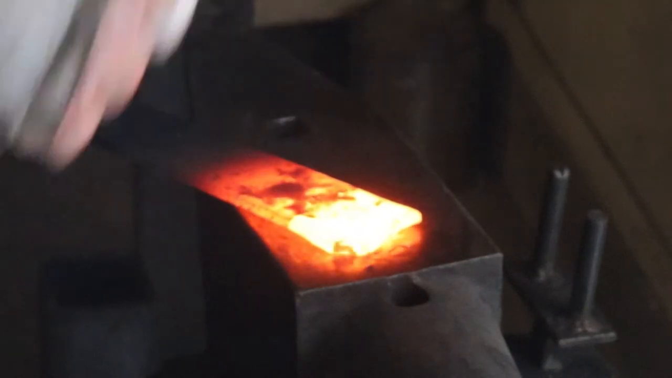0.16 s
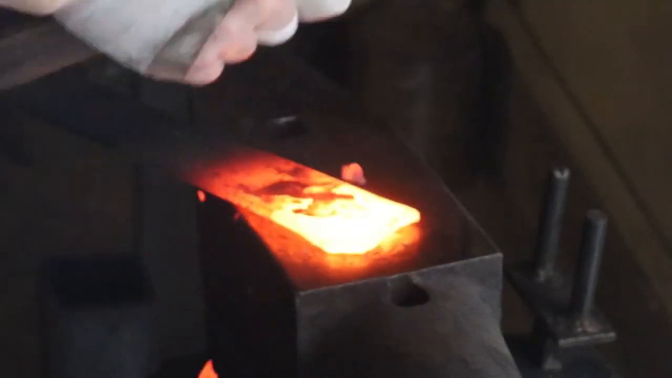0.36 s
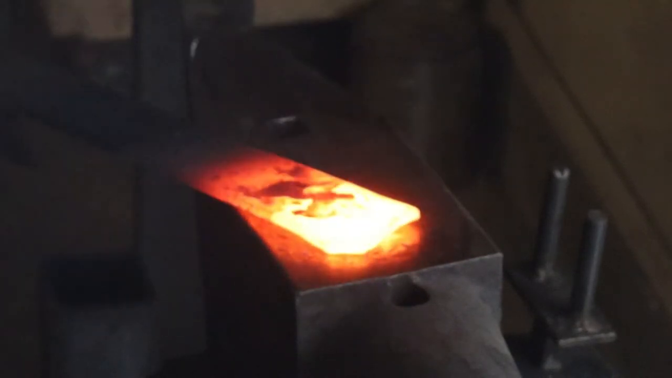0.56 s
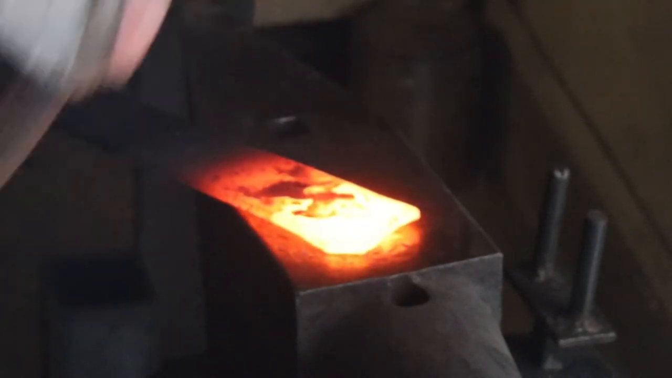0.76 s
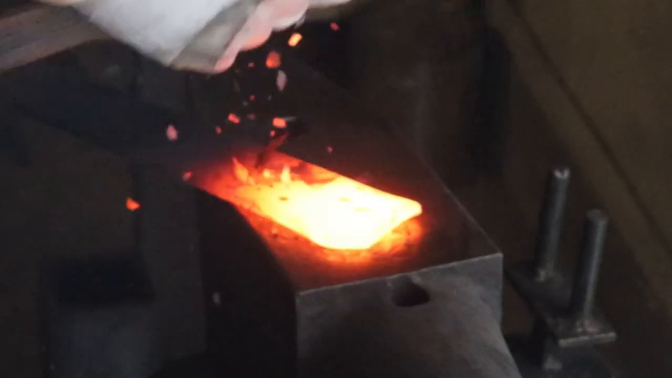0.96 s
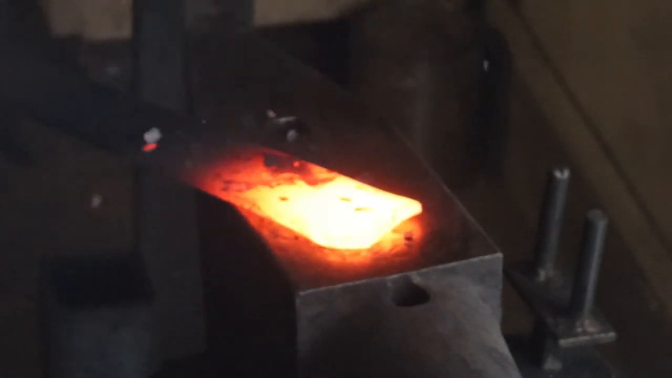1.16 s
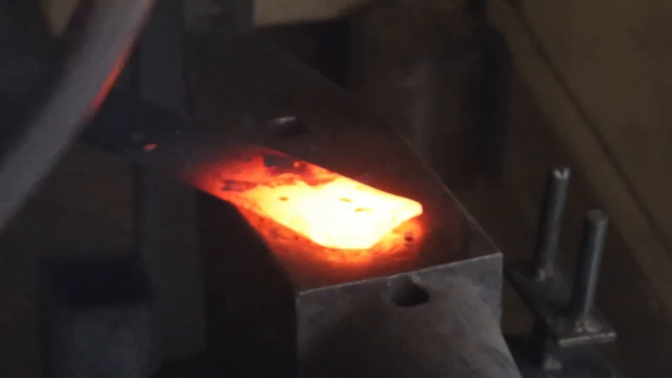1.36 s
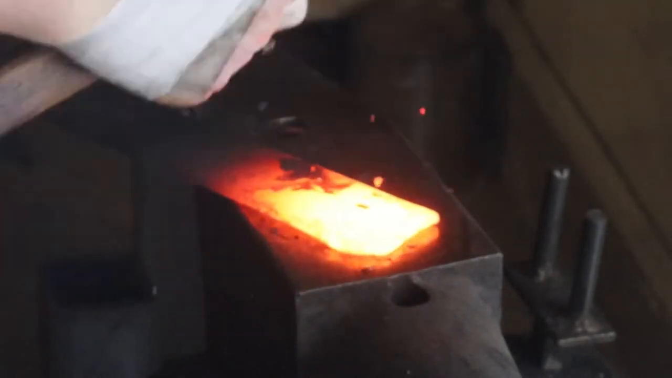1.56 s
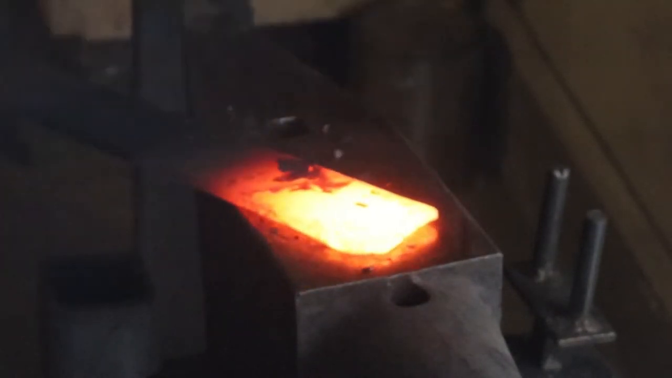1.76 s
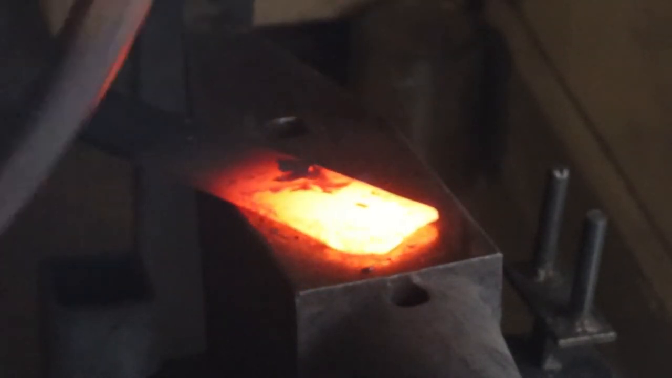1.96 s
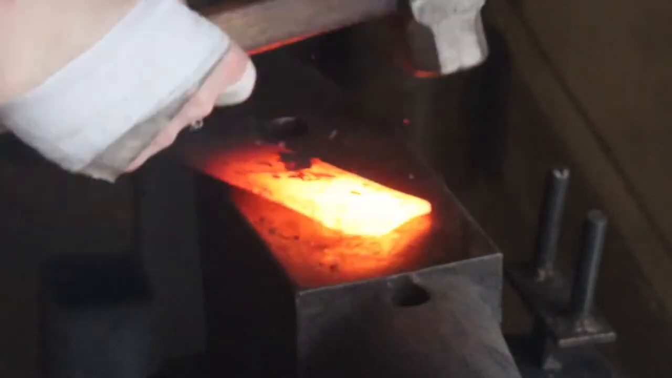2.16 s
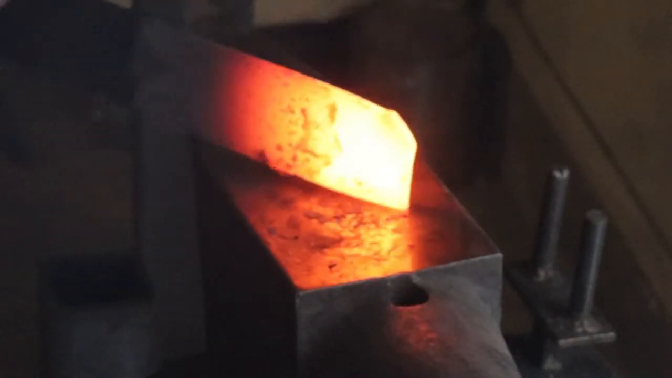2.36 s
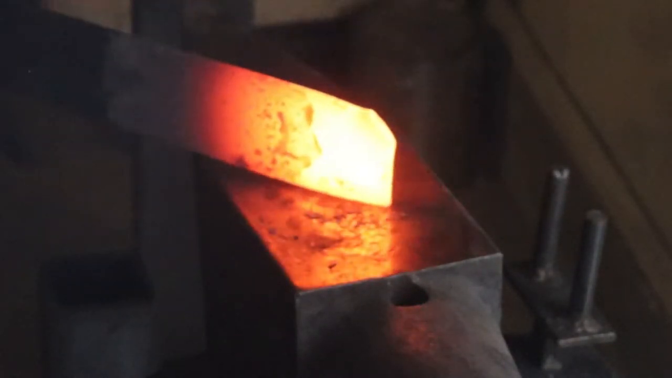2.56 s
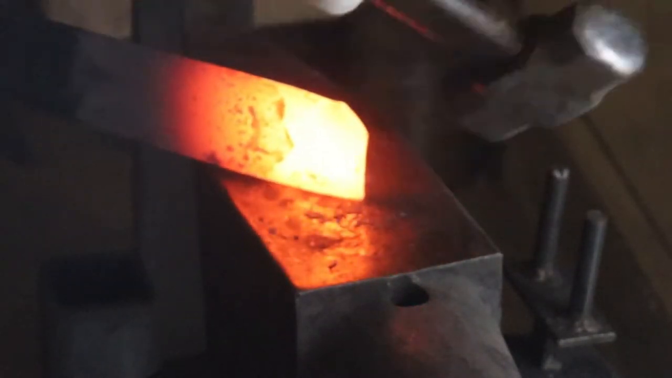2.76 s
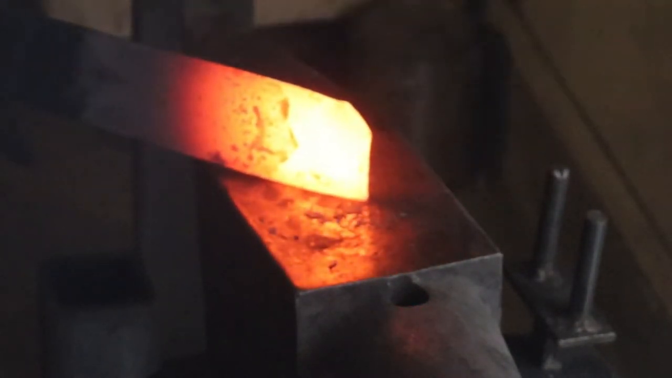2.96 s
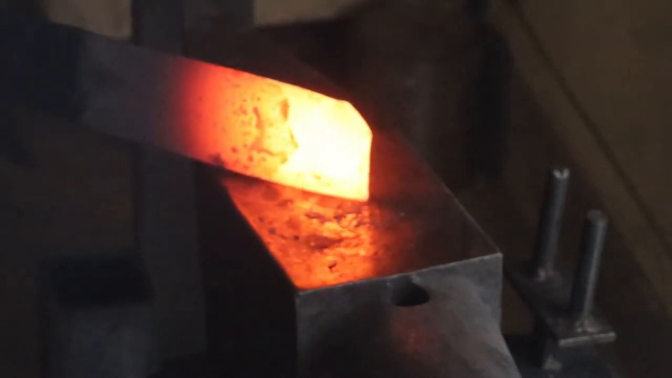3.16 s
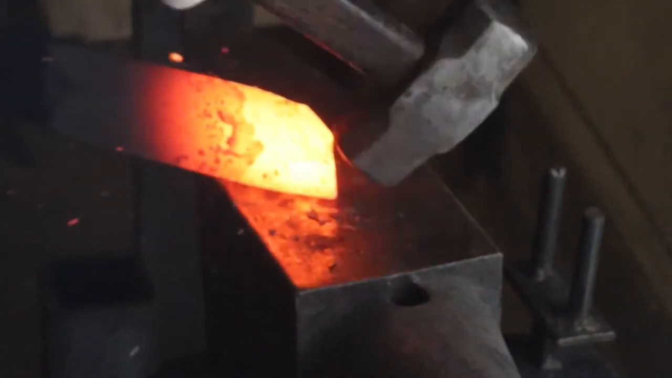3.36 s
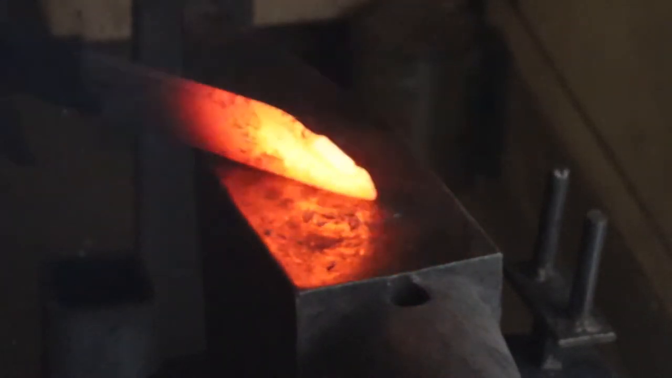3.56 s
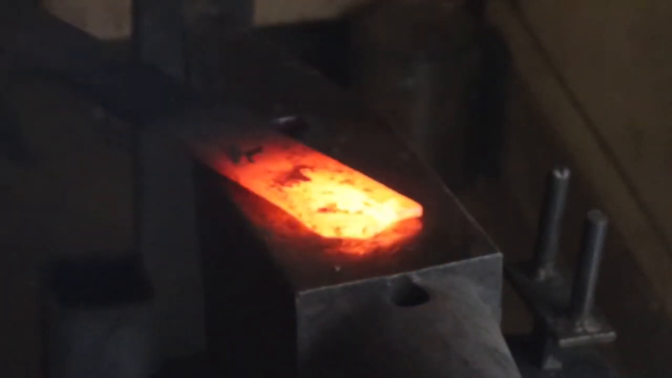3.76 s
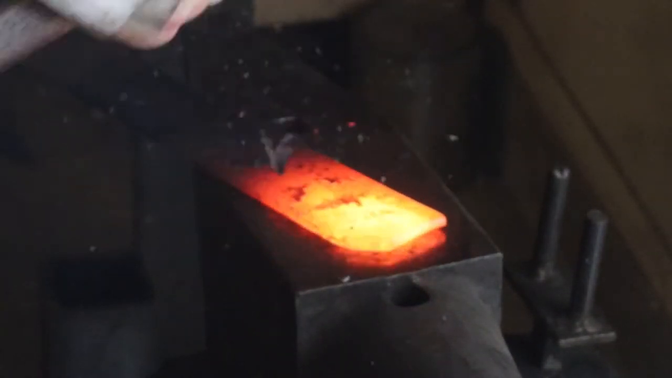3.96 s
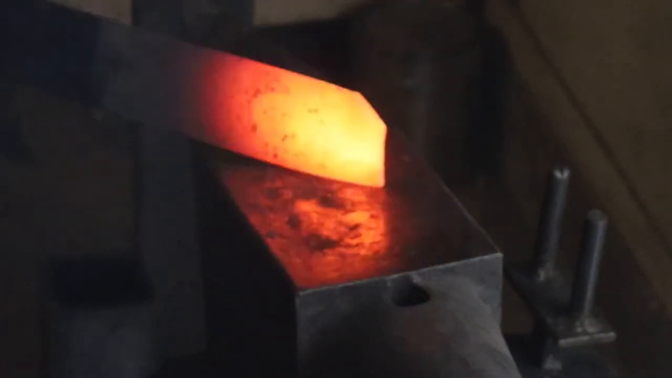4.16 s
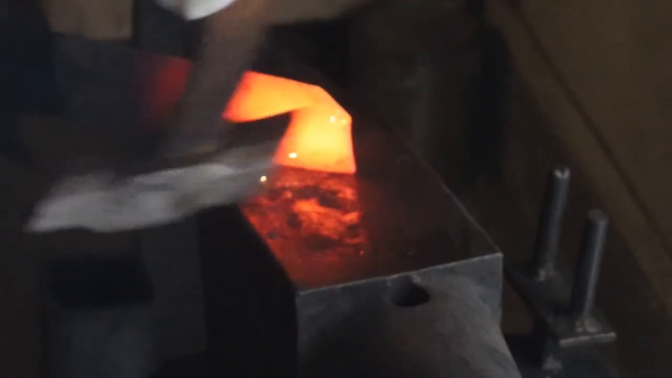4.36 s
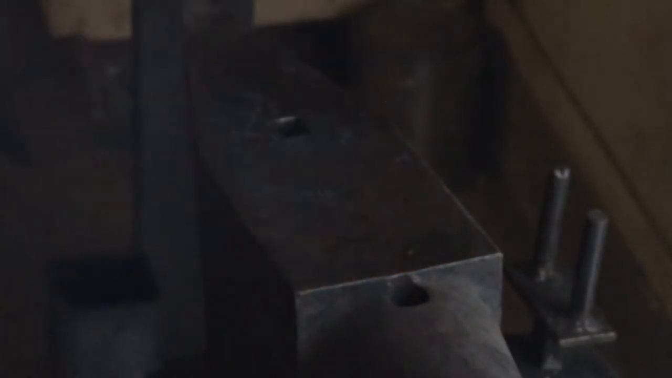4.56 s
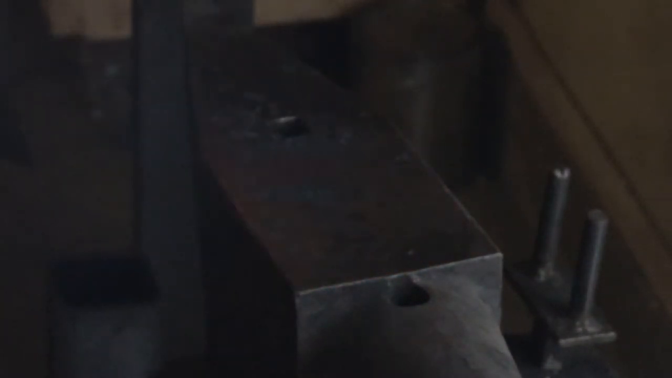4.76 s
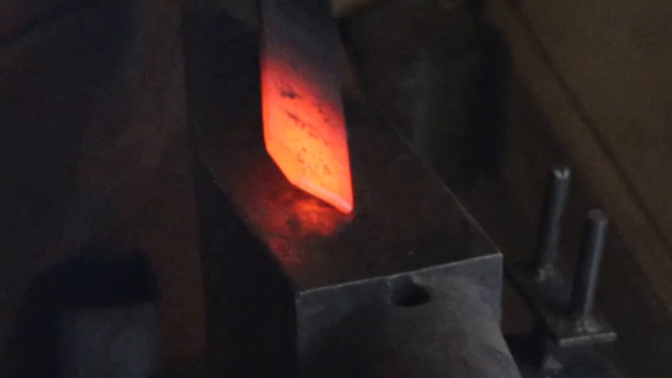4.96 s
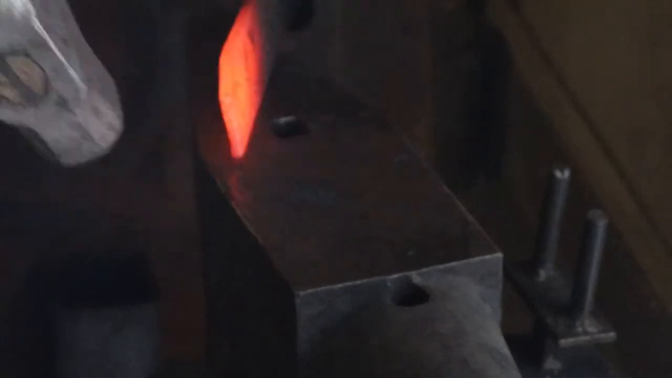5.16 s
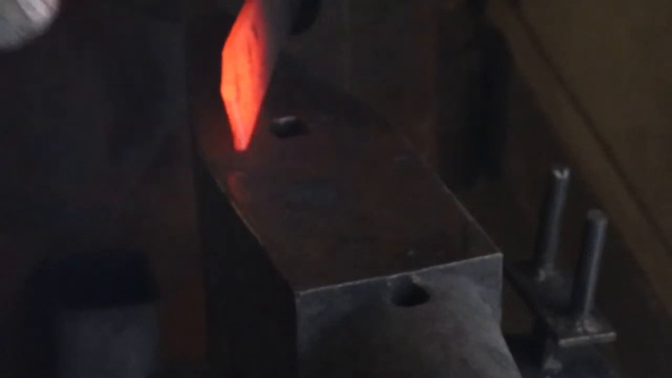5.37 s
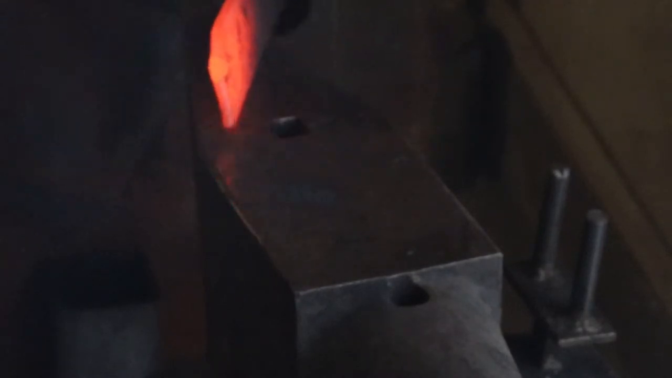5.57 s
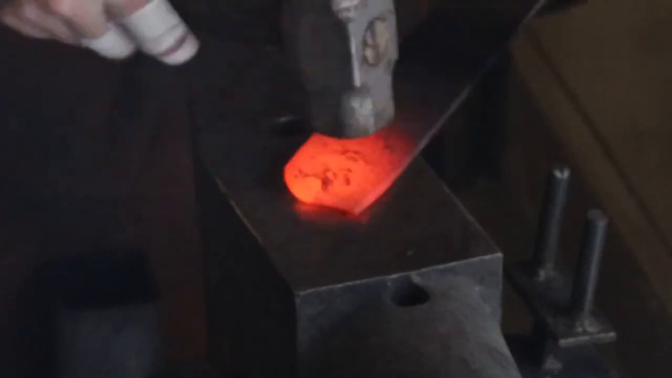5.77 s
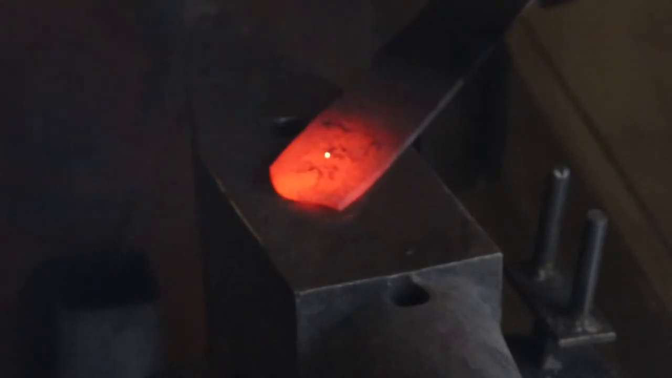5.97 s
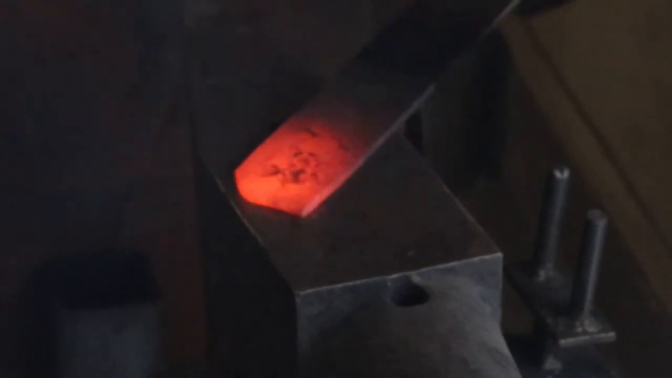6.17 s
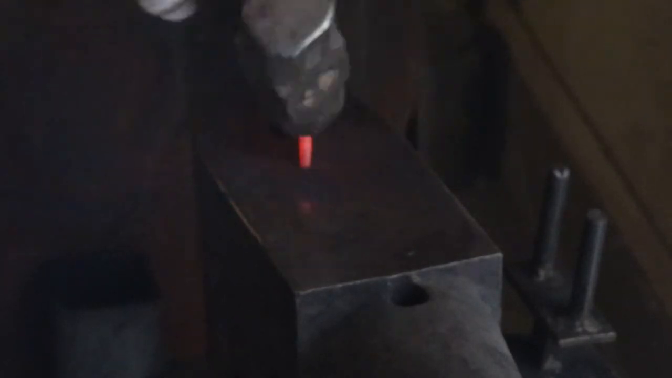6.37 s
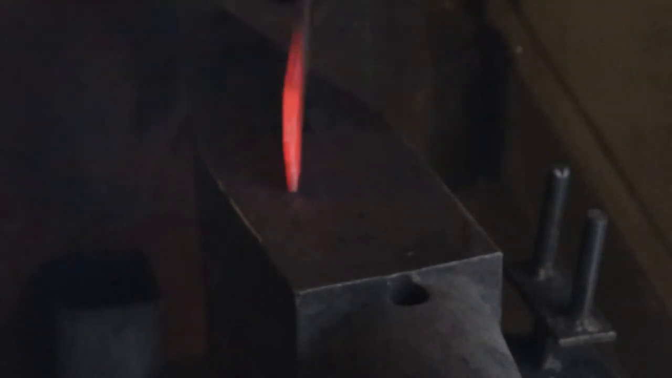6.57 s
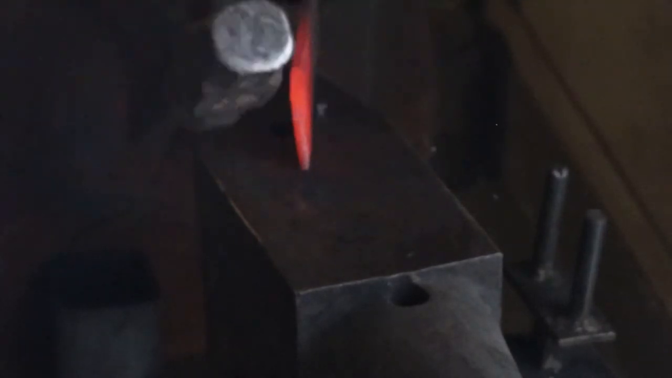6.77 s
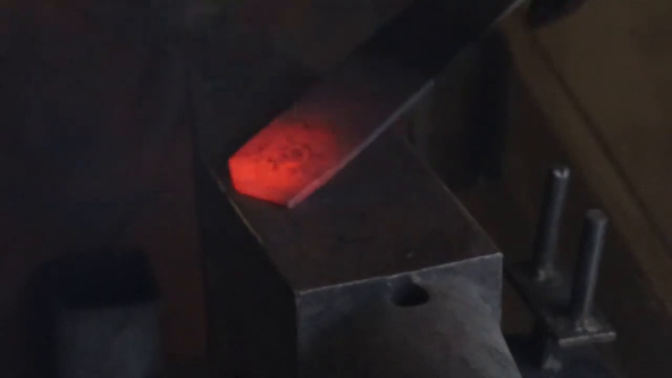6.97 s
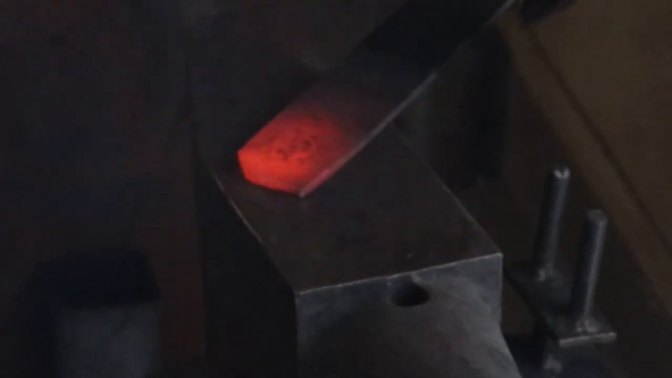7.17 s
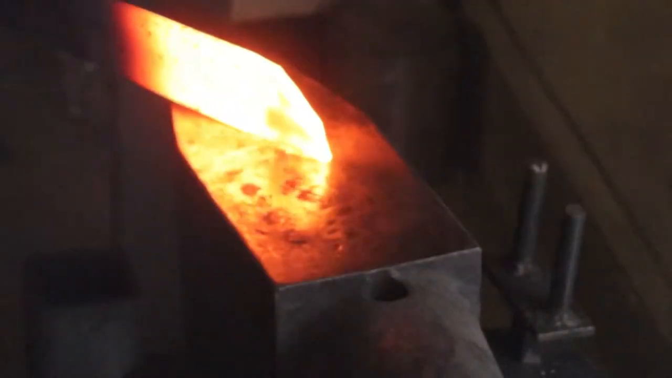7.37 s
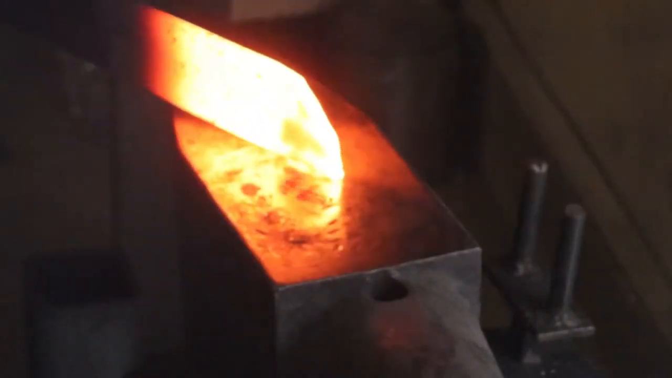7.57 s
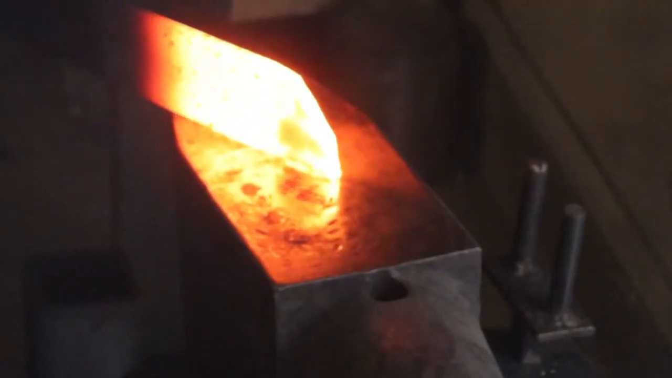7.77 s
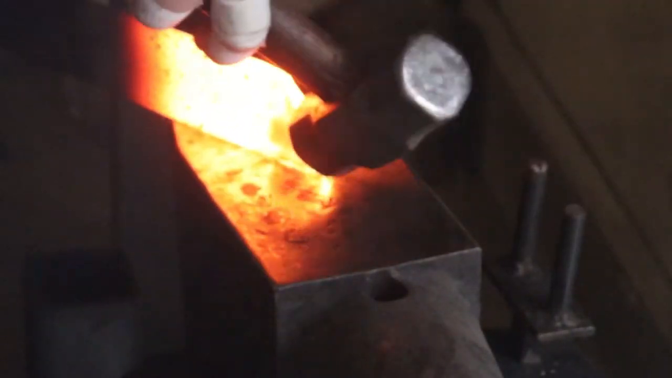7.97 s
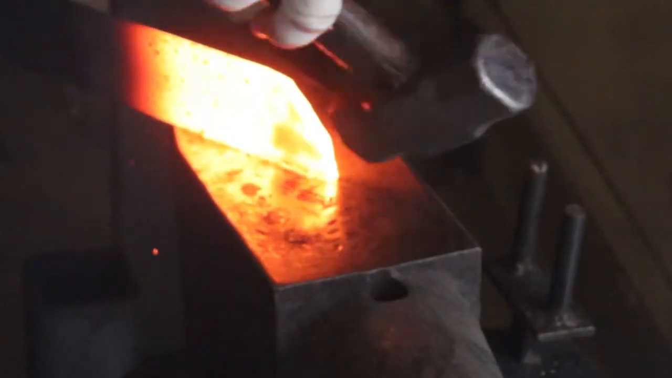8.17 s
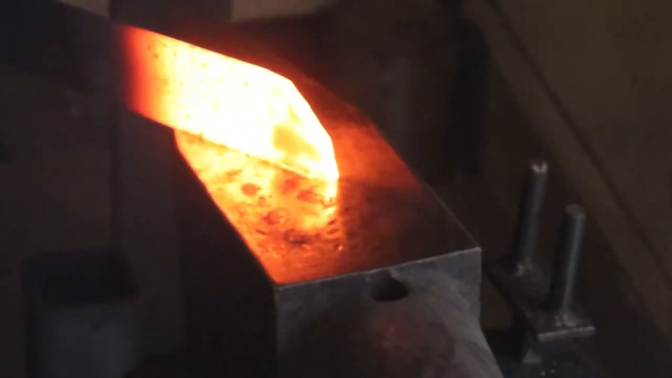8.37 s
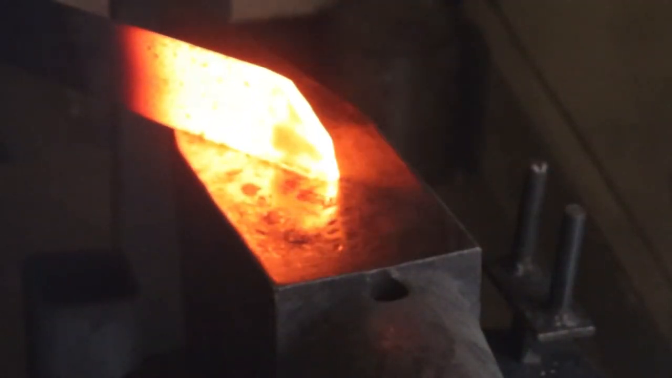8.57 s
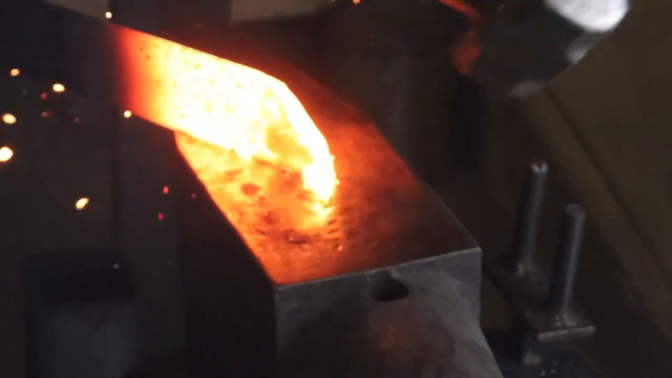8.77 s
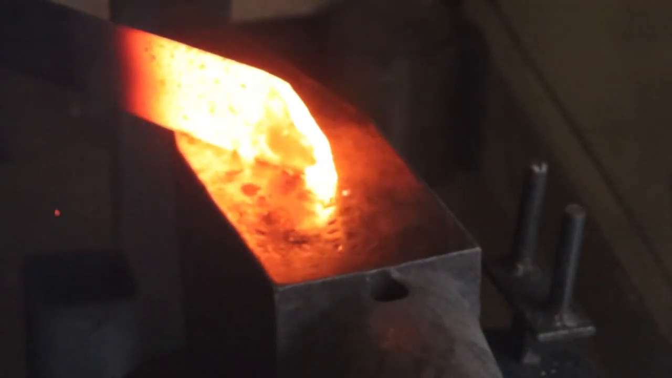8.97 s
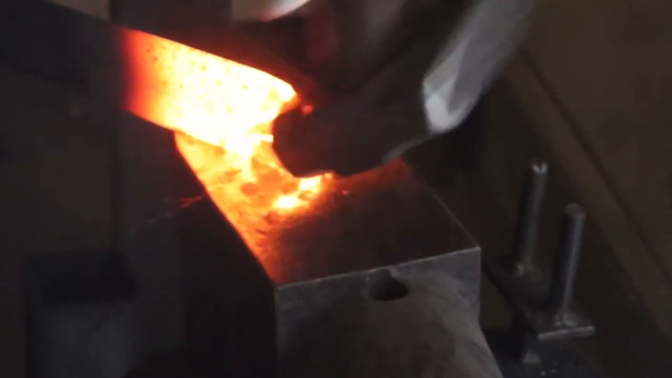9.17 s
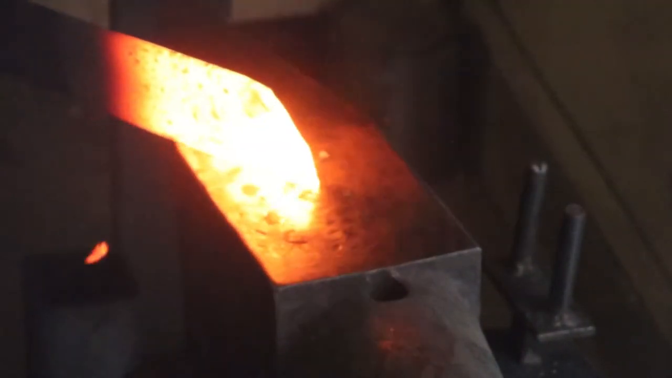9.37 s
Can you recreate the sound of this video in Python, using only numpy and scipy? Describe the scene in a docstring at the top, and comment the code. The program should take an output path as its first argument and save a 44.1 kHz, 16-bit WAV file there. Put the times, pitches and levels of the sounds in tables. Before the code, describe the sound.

A hammer rings on hot steel and anvil over a roaring forge, speeds into rapid clicks and hiss, then strikes in a quiet workshop.

```python
"""A hard-walled workshop, where a smith hammers red-hot steel on an anvil over the roar of a forge.
Each impact is a broadband crack plus damped modes. Hard blows overload the microphone, whose gain
control ducks the roar and holds up the room's tail. The middle of three stretches runs eight times
as fast, so blows shrink to clicks and the roar to a hiss, among squeaks, knocks and scrapes of steel.
In the last stretch, at natural speed again, the forge is quiet."""
import sys
import numpy as np
from scipy import signal
from scipy.fft import irfft, next_fast_len
from scipy.io import wavfile
from scipy.ndimage import uniform_filter1d

SR = 44100
rng = np.random.default_rng(int(sys.argv[2]) if len(sys.argv) > 2 else 0)


def int16_out(signal):
    """Quantize to a 16-bit WAV file."""
    q = np.round(np.clip(np.atleast_2d(signal).T, -1, 1) * 32767)
    wavfile.write(sys.argv[1], SR, q.astype(np.int16))


N = 414981


def amp(db):
    """Amplitude ratio: tenfold for every 20 dB."""
    return 10 ** (np.asarray(db) / 20)


def curve_at(points, hz):
    """Linear interpolation over logarithmic frequency."""
    frequencies, values = np.transpose(points)
    return np.interp(np.log(hz + 1), np.log(frequencies + 1), values)


def tilt_db(hz, tilt, knee_hz=700, pivot_hz=2500):
    """Spectral tilt: a slope in dB per octave that levels off below the knee."""
    return tilt * np.log2((hz + knee_hz) / (pivot_hz + knee_hz))


def seconds(length):
    """Uniform sampling: a time axis in seconds."""
    return np.arange(int(length * SR)) / SR


def decay(t, t60):
    """Exponential damping: 60 dB in t60 seconds."""
    return np.exp(-np.log(1000) * t / t60)


def add(mix, time, sound):
    """Superposition: a sound joins the mix at a time in seconds."""
    part = mix[:, max(round(time * SR), 0):][:, :sound.shape[-1]]
    part += sound[..., :part.shape[1]]


# Likeness of the left and right channels: (frequency [Hz], correlation [ratio])
COHERENCE = [(25, 1), (60, 0.95), (150, 1), (500, 0.86), (1200, 0.38), (4000, 0.19), (14000, 0.25)]

def noise(size, spectrum, tilt=0):
    """Partial coherence: coloured stereo noise of unit rms, most alike in the bass."""
    padded = next_fast_len(size, True)
    hz = np.fft.rfftfreq(padded, 1 / SR)
    mid, side = rng.standard_normal((2, len(hz), 2)).view(complex)[..., 0]
    correlation = curve_at(COHERENCE, hz)
    colour = amp(curve_at(spectrum, hz) + tilt_db(hz, tilt))
    mid = mid * colour * np.sqrt(1 + correlation)
    side = side * colour * np.sqrt(1 - correlation)
    stereo = irfft(np.array([mid + side, mid - side]), padded)[:, :size]
    return stereo / stereo.std()


def rush(size, spectrum, flutter_db=0.04):
    """Random amplitude modulation: noise whose level wavers very slightly."""
    flutter = amp(flutter_db * rng.standard_normal(size // 3000))
    envelope = np.interp(np.arange(size), np.linspace(0, size, len(flutter)), flutter)
    return envelope * noise(size, spectrum)


# Spectrum of the forge with its blower on: (frequency [Hz], relative density [dB])
FORGE_SPECTRUM = [(10, -57), (30, -11.5), (70, -14), (150, -11.5), (310, 2), (450, 0), (800, -2.5),
                  (1100, -7), (2000, -8.5), (4500, -16.5), (8000, -24.5), (12000, -34), (16000, -43)]

def forge_roar(size):
    """Broadband flow noise: the blown forge roars, most strongly near 300 Hz."""
    return amp(-32) * rush(size, FORGE_SPECTRUM)


# Tones of the shop's motors: (frequency [Hz], level [dB])
MOTOR_TONES = [(97, -70), (147, -56.5)]

def motor_hum(size):
    """Periodic vibration: motors at constant speed radiate steady tones."""
    t = np.arange(size) / SR
    return sum(amp(db) * np.sin(2 * np.pi * hz * t) for hz, db in MOTOR_TONES)


# Spectrum of steel striking steel: (frequency [Hz], relative density [dB])
CRACK_SPECTRUM = [(20, -13), (95, -14), (145, -2), (220, -3), (360, -11), (520, -5), (1300, 1.5),
                  (2200, -2.5), (4000, 1), (6500, -4), (9000, -10), (12000, -14.5), (16000, -22)]
# Modes of the anvil with the work on it: (frequency [Hz], level [dB], T60 [s])
ANVIL_MODES = [(229.4, -20, 0.06), (625.3, -18.5, 0.087), (966, -17.5, 0.056), (1188, -15, 0.037),
               (1348, -15, 0.051), (1495, -10, 0.05), (1668, -17, 0.055), (1859, -7, 0.037),
               (2450, -25, 0.32), (2587, -18.5, 0.18), (3052, -13, 0.097), (3720, -9.5, 0.082),
               (3797, -15.5, 0.18), (4510, -12, 0.15), (5330, -16, 0.17), (5985, -16.5, 0.15),
               (6790, -23, 0.1), (7000, -19, 0.12), (9240, -22, 0.18)]

def hammer_blow(force_db, tilt, scatter_db=1.5, spread_rad=0.22):
    """Impact excitation: a crack, and anvil modes whose mixture depends on where the hammer lands."""
    t = seconds(0.2)
    envelope = decay(t, t60=0.096) + 0.58 * decay(t, t60=0.045)  # body and first snap
    crack = noise(len(t), CRACK_SPECTRUM, tilt) * envelope
    modes = np.array([amp(db) * decay(t, t60) * np.exp(2j * np.pi * hz * t)
                      for hz, db, t60 in ANVIL_MODES])
    mode_hz = np.array(ANVIL_MODES)[:, 0]
    weights = amp(scatter_db * rng.standard_normal(len(modes)) + tilt_db(mode_hz, tilt))
    phases = 2 * np.pi * rng.random(len(modes)) + spread_rad * rng.standard_normal((2, len(modes)))
    anvil = ((weights * np.exp(1j * phases)) @ modes).real
    return amp(force_db) * (crack + anvil)


def ring(hz, db, t60, detune=0.0038, twin_gain=0.82):
    """Beating: two close modes drift in and out of phase as they die."""
    t = seconds(2)
    phase = 2 * np.pi * hz * t
    return amp(db) * decay(t, t60) * (np.sin(phase) + twin_gain * np.sin((1 - detune) * phase))


# Deliberate blows, the first already dying away as the scene opens:
# (time [s], force [dB], tilt [dB/octave], bar's note [Hz], note level [dB])
SINGLE_BLOWS = [(-.42, 7, 3, 2600, -18), (0.3126, 5, 1, 2475, -15), (0.9194, 9, 1, 2970, -7),
                (1.5355, 6.5, .5, 2585, -17), (2.1367, 7.5, 0, 2574, -3.5),
                (2.7685, -5.5, 0.05, 5320, -10.5), (8.0066, -12.5, -2.5, 5140, -24),
                (8.7406, -0.5, -2.5, 3650, -22), (9.286, 2, -3, 2570, -5.5)]
# Extra modes of the bar while it lies flat: (frequency [Hz], level [dB], T60 [s])
FLAT_BAR_MODES = [(623, -15.5, 0.12), (3750, -17, .25), (12100, -38, 1.2)]

def single_blows(note_t60=0.16, flat_until_s=2.2):
    """Free vibration: each blow rings a note set by how the bar rests; hot steel damps it quickly."""
    for time, force_db, tilt, note_hz, note_db in SINGLE_BLOWS:
        yield time, hammer_blow, (force_db, tilt)
        yield time, ring, (note_hz, note_db, note_t60)
        if time < flat_until_s:
            for mode in FLAT_BAR_MODES:
                yield time, ring, mode


# Response of the room, weak in the deep bass: (frequency [Hz], relative level [dB])
ROOM_SPECTRUM = [(20, -13.5), (95, 0.5), (145, -1.5), (600, 2), (1500, 0.5), (4000, -1), (16000, 1.5)]
# Reverberation time of the room: (frequency [Hz], T60 [s])
ROOM_DECAY = [(60, 0.8), (250, 0.59), (1000, 0.67), (4000, 0.62), (8000, 0.5), (15000, 0.23)]

def reverberate(sound, wet_db=-0.94, build_s=0.008):
    """Reverberation: hard walls add a dense tail that builds quickly and dies sooner in the treble."""
    hz, t, bands = signal.stft(noise(SR, ROOM_SPECTRUM), SR, nperseg=256)
    envelope = decay(t, curve_at(ROOM_DECAY, hz)[:, None]) * (1 - np.exp(-t / build_s))
    _, tail = signal.istft(bands * envelope, SR, nperseg=256)
    reflections = signal.oaconvolve(sound, tail / np.linalg.norm(tail[0]), axes=1)
    return sound + amp(wet_db) * reflections[:, :sound.shape[1]]


def gain_control(sound, threshold_db=-16, attack_s=0.012, recovery_db_per_s=88, ceiling=0.82):
    """Compression: the gain falls too late to stop a hard blow clipping, and recovers with the tail."""
    block = 32  # samples
    blocks = sound[:, :sound.shape[1] // block * block].reshape(2, -1, block)
    power = signal.lfilter(np.ones(4) / 4, 1, np.mean(blocks ** 2, axis=(0, 2)))
    t = np.arange(len(power)) * block / SR
    excess_db = np.maximum(10 * np.log10(power + 1e-12) - threshold_db, 0)
    held_db = np.maximum.accumulate(excess_db + recovery_db_per_s * t) - recovery_db_per_s * t
    pole = np.exp(-block / SR / attack_s)
    reduction_db = signal.lfilter([(1 - pole) ** 2], [1, -2 * pole, pole ** 2], held_db)
    gain = np.interp(np.arange(sound.shape[1]) / SR, t, amp(-reduction_db))
    return np.clip(sound * gain, -ceiling, ceiling)


# Runs of even blows, with pauses to turn the bar: (first time [s], last time [s], blows [count],
# slowing [ratio], settled force [dB], first blow's offset [dB], tilt [dB/octave])
HAMMER_RUNS = [(3.2667, 3.6105, 5, 0.0025, 7.5, -5.5, -2), (3.7047, 4.188, 7, 0.0055, 14, -6.5, 1),
               (4.2748, 4.4455, 3, 0.011, -2.5, 5.5, -0.5), (5.193, 5.7452, 9, .084, 9, -12.5, .5),
               (5.9099, 6.3576, 7, 0, 11, -0.5, 2), (6.4475, 6.8347, 6, .011, 14.5, -16.5, 0),
               (7.0032, 7.2822, 5, 0.026, 3, 12, 2.5)]

def hammer_runs(settle_blows=1.9, scatter_db=1.7):
    """Quasi-periodic impacts: the beat drags as the arm tires, and the force settles in a few blows."""
    for first, last, count, slowing, force_db, offset_db, tilt in HAMMER_RUNS:
        index = np.arange(count)
        progress = index / index[-1]
        times = first + (last - first) * (progress - slowing * progress * (1 - progress))
        forces_db = force_db + offset_db * np.exp(-index / settle_blows)
        forces_db += scatter_db * rng.standard_normal(count)
        for time, db in zip(times, forces_db):
            yield time, hammer_blow, (db, tilt)


# Squeaks and chirps, with durations and pitches at natural speed:
# (time [s], duration [s], first pitch [Hz], last pitch [Hz], level [dB])
SQUEAK_GLIDES = [(3.595, 0.2, 725, 767, -30), (3.65, 0.16, 790, 870, -33), (3.737, 0.51, 863, 895, -31),
                 (3.82, 0.26, 845, 823, -25), (7.385, 0.027, 2163, 1976, -10.5),
                 (7.39, 0.13, 1933, 1935, -19)]

def squeak(length, first_hz, last_hz, db, waver=0.018, octave_db=-19):
    """Frequency modulation: a gliding tone of unsteady pitch starts quickly and fades."""
    t = seconds(0.46)
    progress = np.minimum(t / length, 1)
    drift = uniform_filter1d(rng.standard_normal(len(t)), size=200)
    hz = (first_hz + (last_hz - first_hz) * progress) * (1 + waver * drift / drift.std())
    phase = 2 * np.pi * np.cumsum(hz) / SR
    envelope = np.sin(np.pi * np.sqrt(progress))
    return amp(db) * envelope * (np.sin(phase) + amp(octave_db) * np.sin(2 * phase))


# Spectrum of thin steel lightly knocked or rubbed: (frequency [Hz], relative density [dB])
THIN_STEEL_SPECTRUM = [(60, -46), (250, -12), (600, 8.5), (1500, 18), (4000, 20), (7000, 10.5),
                       (11000, -2.5), (16000, -10)]
# Modes of a loose steel tool: (frequency [Hz], level relative to the knock [dB], T60 [s])
TOOL_MODES = [(566, -35, 1.03), (1026, -26, 0.57), (1780, -26, 0.99), (1866, -22, 0.55)]
# Clatter of bar and tools: (time [s], level [dB])
TOOL_KNOCKS = [(4.4716, -13), (4.5012, 3), (4.5163, -2), (4.5335, 22), (4.5929, 9), (4.882, -12),
               (4.962, -13), (5.1316, -6.5), (5.8385, -2.5), (6.9282, 4), (7.942, -30.5), (9.2165, -53)]

def knock(db, t60=0.094):
    """Impulse response: a short, thin clack leaves a tool ringing in its modes."""
    t = seconds(0.2)
    sound = np.tile(sum(ring(*mode) for mode in TOOL_MODES), (2, 1))
    add(sound, 0, noise(len(t), THIN_STEEL_SPECTRUM) * decay(t, t60))
    return amp(db) * sound


# Slides of the bar on the anvil: (time [s], duration at natural speed [s], level [dB])
BAR_SLIDES = [(4.48, 0.58, -22), (4.57, 0.67, -16), (7.36, 0.092, -34), (7.49, 0.11, -32.5),
              (7.89, 0.072, -39), (8.42, 0.091, -49)]

def scrape(length, db, grit_db=4):
    """Sliding friction: gritty noise swells and fades over one stroke."""
    t = seconds(1.0)
    grit = uniform_filter1d(rng.standard_normal(len(t)), size=150)
    stroke = np.sin(np.pi * np.sqrt(np.minimum(t / length, 1)))
    return amp(db + grit_db * grit / grit.std()) * stroke * noise(len(t), THIN_STEEL_SPECTRUM)


# Spectrum of the shop with the blower off: (frequency [Hz], relative density [dB])
IDLE_SPECTRUM = [(15, -38), (25, 8), (130, 5.5), (344, 8.5), (840, -2.5), (1520, -3.5), (1700, -3),
                 (3250, -5.5), (9070, -16), (16000, -23)]

def idle_shop(size):
    """Ambient noise: a faint, low rush remains while the forge is quiet."""
    return amp(-46.5) * rush(size, IDLE_SPECTRUM)


def stretch(start, end, background, level_db, speed=1):
    """Time scaling: work sounds at its natural rate, then speed shortens it and raises every pitch."""
    size = (round(end * SR) - round(start * SR)) * speed
    events = [*single_blows(), *hammer_runs()]  # (time [s], source, its settings)
    for table, source in (SQUEAK_GLIDES, squeak), (TOOL_KNOCKS, knock), (BAR_SLIDES, scrape):
        events += [(time, source, settings) for time, *settings in table]
    work = np.zeros((2, size))
    for time, source, settings in events:
        if start <= time < end:
            add(work, (time - start) * speed, source(*settings))
    shop = reverberate(work) + background(size) + motor_hum(size)
    return amp(level_db) * signal.resample_poly(gain_control(shop), 1, speed, axis=1)


def scene():
    """Concatenation: steady hammering, sped-up work and the quiet shop follow one another abruptly."""
    lead_in_s, fast_from_s, fast_to_s = 0.5, 3.247, 7.288
    opening = stretch(-lead_in_s, fast_from_s, forge_roar, level_db=2.5)
    fast = stretch(fast_from_s, fast_to_s, forge_roar, level_db=2, speed=8)
    closing = stretch(fast_to_s, N / SR, idle_shop, level_db=1.5)
    return np.hstack([opening[:, round(lead_in_s * SR):], fast, closing])


def record(dry, cutoff_hz=16050):
    """Band limiting: a steep low-pass filter removes the highest treble."""
    lowpass = signal.firwin(601, cutoff_hz, window=("kaiser", 8), fs=SR)
    return signal.oaconvolve(dry, lowpass[None], "same")


dry = scene()
out = record(dry)
int16_out(out)
```